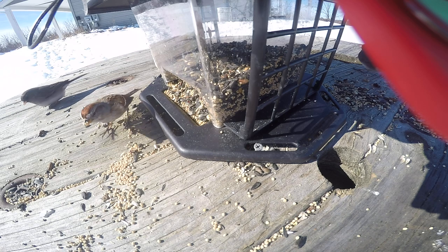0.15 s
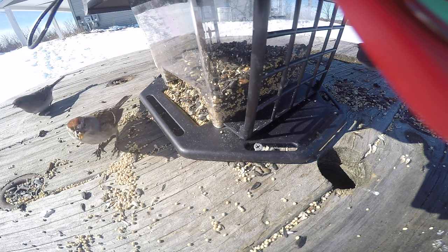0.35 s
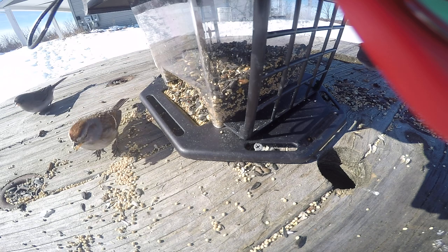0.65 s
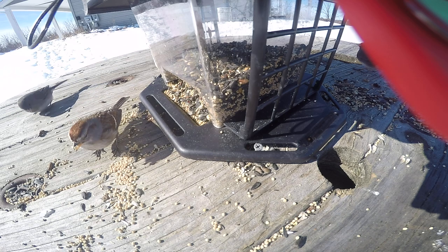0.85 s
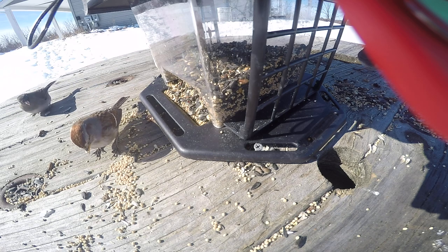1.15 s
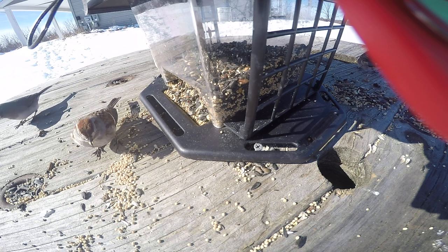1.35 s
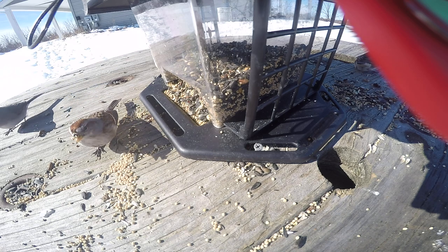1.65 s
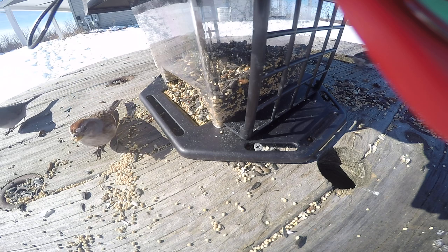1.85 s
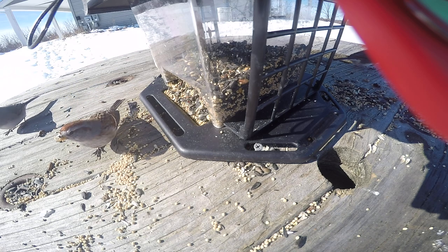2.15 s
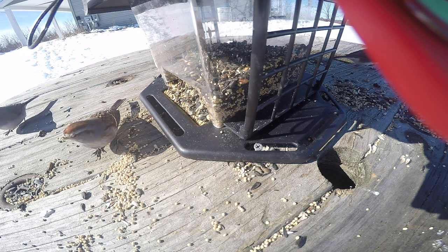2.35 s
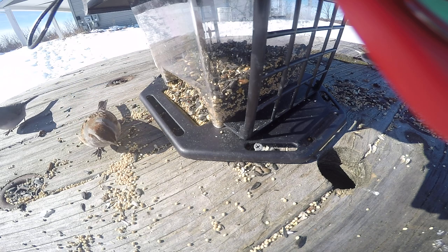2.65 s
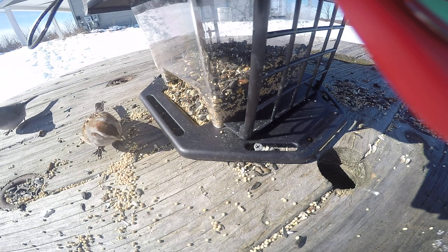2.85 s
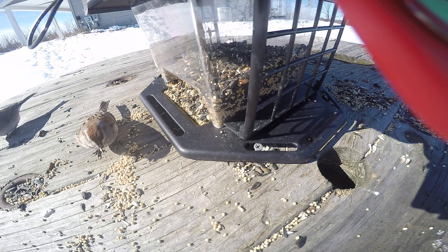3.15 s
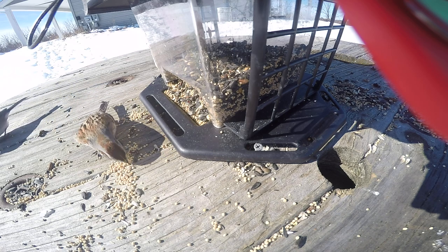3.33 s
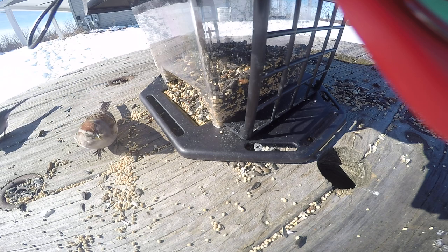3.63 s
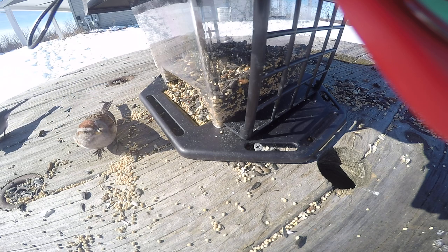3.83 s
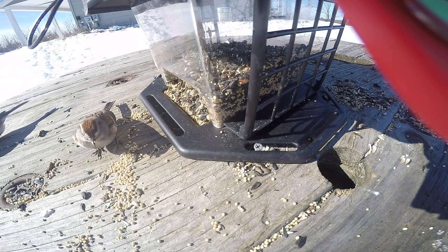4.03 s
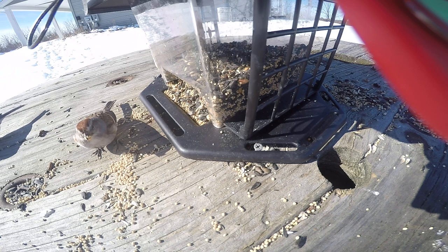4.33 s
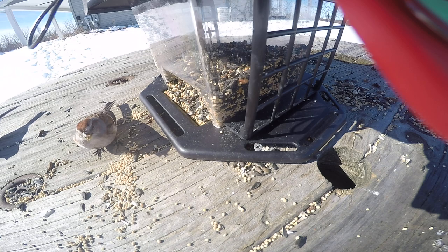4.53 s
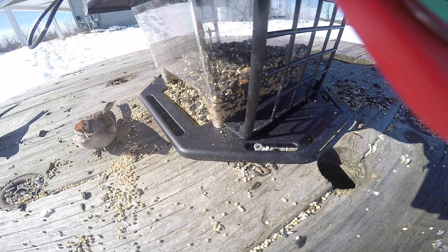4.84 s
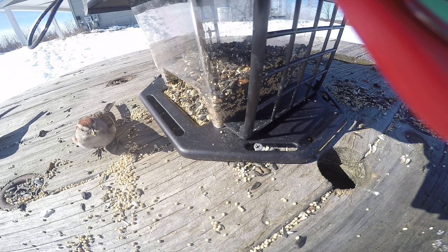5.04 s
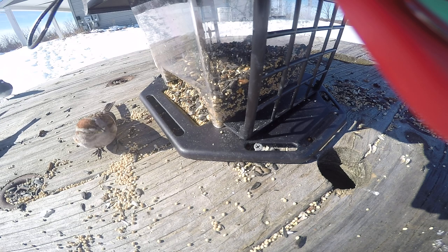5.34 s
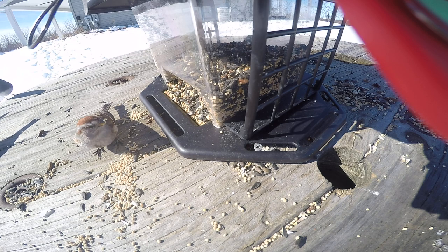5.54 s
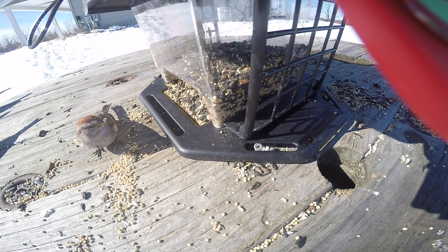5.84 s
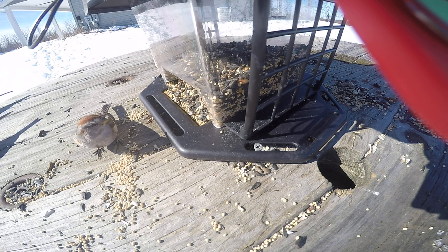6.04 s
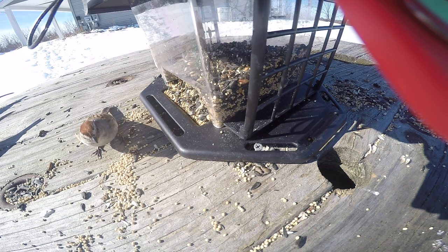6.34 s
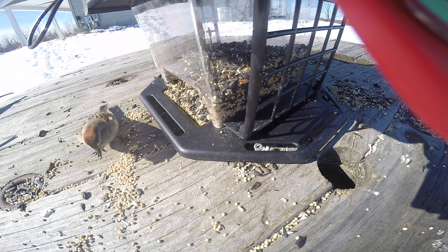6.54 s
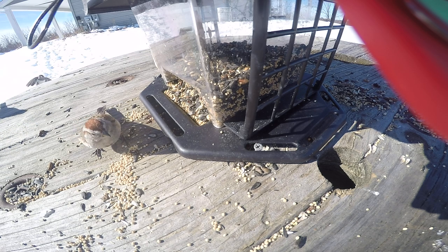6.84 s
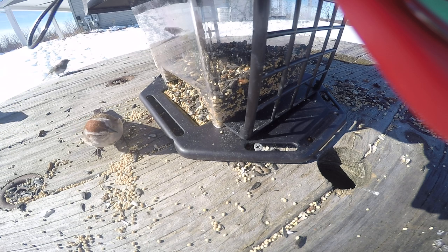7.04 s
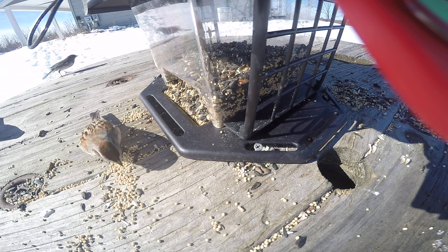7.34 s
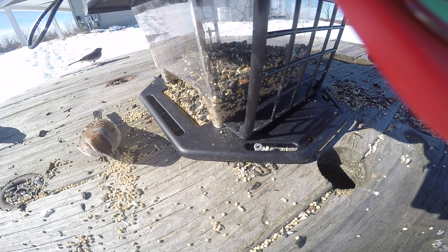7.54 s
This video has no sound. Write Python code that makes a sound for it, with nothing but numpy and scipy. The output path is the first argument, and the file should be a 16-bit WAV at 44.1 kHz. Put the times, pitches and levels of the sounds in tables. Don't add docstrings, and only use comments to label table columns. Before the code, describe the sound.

Over soft hiss and wind rumble, beaks tick on seed, a bird gives a quick run of descending chips, and little feet knock on board.

```python
import sys
import numpy as np
from scipy import signal
from scipy.fft import rfft, irfft
from scipy.io import wavfile
from scipy.ndimage import uniform_filter1d

SR = 44100
rng = np.random.default_rng(int(sys.argv[2]) if len(sys.argv) > 2 else 0)


def rack_gain(trim_db):
    fader = np.asarray(trim_db, float)
    return 10 ** (fader / 20)


def int16_out(signal):
    q = np.round(np.clip(np.atleast_2d(signal).T, -1, 1) * 32767)
    wavfile.write(sys.argv[1], SR, q.astype(np.int16))


N = 338688

# start in seconds, peak level in dB, level of the bright part in dB,
# ring time in seconds, level of the claw tick on the tray in dB.
LANDINGS = [(4.263, -46.5, -49.5, 0.11, -41), (4.286, -39, -52, 0.11, -46), (4.391, -44, -50.5, 0.13, -54),
            (4.476, -38.5, -47.5, 0.08, -49), (4.598, -41, -52, 0.056, -52), (4.626, -45, -51, 0.14, -62),
            (4.724, -49.5, -57, 0.084, -52.5), (4.805, -55, -63, 0.1, -53.5),
            (4.866, -33.5, -39.5, 0.12, -34.5), (4.89, -47.5, -71, 0.16, -68), (5.65, -52, -56, 0.071, -48),
            (5.926, -52.5, -72, 0.062, -52), (6.039, -46, -50, 0.11, -62), (6.254, -51, -58, 0.08, -66),
            (6.413, -45, -51.5, 0.13, -62), (6.608, -69, -65, 0.094, -68), (6.738, -39, -50.5, 0.12, -60),
            (6.776, -52, -58, 0.054, -54), (1.815, -55, -52, 0.07, -70)]


def level(x, db):
    return x * rack_gain(db) / np.sqrt(np.mean(x ** 2))


def band(x, lo_hz, hi_hz, order=2):
    edges_hz = [lo_hz, min(hi_hz, 0.45 * SR)]
    return signal.sosfilt(signal.butter(order, edges_hz, "band", fs=SR, output="sos"), x)


def add(out, s, x):
    i = int(s * SR)
    out[i:i + len(x)] += x[:len(out) - i]


def ring(hz, t60, t):
    return np.sin(2 * np.pi * hz * t) * np.exp(-np.log(1000) * t / t60)


def camera():
    # frequency in Hz, density in dB per Hz.
    hiss_colour = [(60, -34), (110, -3.5), (400, -11.5), (1200, -15.5), (1500, -16.5), (2000, -15.5),
                   (3300, -16.5), (7000, -22.5), (13900, -28), (15300, -33)]
    # centre in Hz, width in Hz, level in dB.
    whine_bands = [(1969, 83, -76), (1163, 105, -78), (9540, 110, -84), (14250, 300, -86)]
    hz = np.arange(N // 2 + 1) * SR / N + 1
    corner_hz, corner_db = np.transpose(hiss_colour)
    colour = rack_gain(np.interp(np.log(hz), np.log(corner_hz), corner_db))
    hiss = level(irfft(rfft(rng.standard_normal(N)) * colour, N), -65)
    for centre_hz, width_hz, db in whine_bands:
        lo_hz, hi_hz = centre_hz - width_hz / 2, centre_hz + width_hz / 2
        hiss = hiss + level(band(rng.standard_normal(N), lo_hz, hi_hz, order=1), db)
    whine = np.sin(2 * np.pi * 1948.5 * np.arange(N) / SR)
    return hiss + level(whine, -72.5)


def wind():
    # time in seconds, strength in dB.
    gusts = [(0.0, -62.5), (0.51, -54), (0.62, -59.5), (1.6, -56), (1.67, -73), (1.71, -54), (1.9, -50.5),
             (1.94, -62.5), (4.28, -63.5), (4.3, -55.5), (5.6, -66), (5.67, -53), (5.73, -63),
             (6.72, -62.5), (6.8, -39.5), (6.87, -43), (6.99, -61.5), (7.68, -64)]
    # time in seconds, rise in seconds, fall in seconds, level in dB.
    wing_puffs = [
        (1.8, .05, .06, -62),
        (6.81, .035, 0.052, -40),
    ]
    rumble_db, buffet_db, buffet_follows = -1, -66.5, 0.76
    s, gust_db = np.transpose(gusts)
    t = np.arange(N) / SR
    gust_db = np.interp(t, s, gust_db)
    puffs = np.zeros(N)
    for at, rise, fall, db in wing_puffs:
        puffs += rack_gain(db) * np.exp(-np.abs(t - at) / np.where(t < at, rise, fall))
    rumble = level(band(rng.standard_normal(N), 17.5, 48), 0) * rack_gain(gust_db + rumble_db)
    buffet = level(band(rng.standard_normal(N), 49.4, 82), 0)
    buffet = buffet * rack_gain(buffet_db + buffet_follows * (gust_db + 62.5))
    flapping = puffs * level(band(rng.standard_normal(N), 72, 111), 0)
    return rumble + buffet + flapping


def ticks():
    # start in seconds, peak in dB, centre in Hz, crack against the tone in dB.
    seed_ticks = [(0.2782, -54, 3130, 4.5), (1.498, -56, 3630, 1), (1.5204, -51.5, 3030, 4),
                  (1.8175, -45, 3100, -2), (1.828, -50.5, 3470, 3), (2.092, -52, 2490, 6),
                  (2.176, -56, 3510, -5), (2.231, -43.5, 2850, -13), (3.5036, -41, 4600, -1.5),
                  (3.5813, -53.5, 10060, -5), (3.8448, -62, 3050, -5), (4.2283, -44.5, 2710, -14.5),
                  (4.5723, -51, 2900, 4), (4.6967, -49, 2520, -5), (5.1203, -58, 2050, 7),
                  (5.3945, -60, 3550, 9), (5.4869, -57.5, 5170, 4), (5.6644, -53, 2370, -3),
                  (5.8044, -48.5, 3060, 3.5), (5.896, -53, 2870, 6), (5.9508, -55, 4030, -5),
                  (5.9644, -57, 2670, -5), (5.9903, -54, 3160, 3), (6.3957, -58, 2190, 4),
                  (6.6325, -53.5, 3080, -5), (6.7062, -54, 2560, -5), (6.995, -57.5, 2130, 11),
                  (7.3053, -48, 5300, -5), (7.423, -55, 11500, -20), (4.4752, -46, 3400, -4)]
    # start in seconds, peak in dB, centre in Hz, crack against the tone in dB.
    dull_pecks = [
        (1.7866, -46, 1860, -1),
        (1.8165, -38, 1760, -13),
        (6.0456, -50, 1690, -9),
    ]
    # start in seconds, peak in dB.
    husk_snaps = [(1.7868, -58), (3.5036, -62), (5.8044, -61), (5.9903, -62)]
    claw_lead_s, tray_hz, claw_crack_db = 0.001515, 2520, -4
    husk_hz, husk_crack_db = 8800, 7
    tick_ring_s, peck_ring_s = 0.024, 0.017
    claws = [(s - claw_lead_s, db, tray_hz, claw_crack_db) for s, *_, db in LANDINGS]
    husks = [(s, db, husk_hz, husk_crack_db) for s, db in husk_snaps]
    rows = [(*row, tick_ring_s) for row in [*seed_ticks, *claws, *husks]]
    rows += [(*row, peck_ring_s) for row in dull_pecks]

    out, t = np.zeros(N), np.arange(int(0.033 * SR)) / SR
    chance = rng.standard_normal((len(rows), 2, len(t)))
    for (s, db, hz, crack_db, t60), (push, snap) in zip(rows, chance):
        tone = band(push * np.exp(-np.log(1000) * t / max(t60, 0.003)), hz * 0.9, hz * 1.1)
        crack = band(snap * np.exp(-t / 0.002), hz * 0.45, hz * 1.9)
        tone = tone / np.abs(tone).max()
        crack = rack_gain(crack_db) * crack / np.abs(crack).max()
        add(out, s, rack_gain(db - 1.0) * (tone + crack))
    return out


def scrapes():
    # start in seconds, length in seconds, level in dB, centre in Hz, upper hiss in dB.
    drags = [(4.413, .034, -56, 2520, -6), (4.634, 0.037, -47.5, 2530, -13),
             (4.638, 0.038, -53.5, 3370, -7), (5.86, 0.085, -69, 3200, 3), (6.7, 0.055, -66, 1900, 7.5),
             (4.48, .05, -66, 1400, 4), (4.6, .09, -66, 1500, 7), (4.265, .045, -67, 1200, 4),
             (1.49, .05, -70, 2600, 4), (4.9, 0.057, -72.5, 2400, 1), (5.948, .02, -72, 4200, 11.5),
             (6.035, 0.029, -66, 1670, -6), (6.395, 0.021, -70, 1400, 0), (6.252, 0.024, -71.5, 1170, 7.5)]
    out = np.zeros(N)
    for s, length, db, hz, upper_db in drags:
        count = int(length * SR)
        slips = rng.standard_normal(count) * rack_gain(2.2 * rng.exponential(size=count))
        slips = slips * (rng.random(count) < 0.05)
        hollow = level(band(slips, hz * 0.92, hz * 1.08), 0)
        upper = level(band(slips, hz * 0.45, hz * 1.9), upper_db)
        add(out, s, rack_gain(db) * (hollow + upper) * np.hanning(count) ** 0.39)
    return out


def unroll(rows):
    s, *columns = np.transpose(rows)
    t = np.arange(s[0], s[-1], 1 / SR)
    ends = np.clip(np.minimum(t - s[0], s[-1] - t) / 0.0015, 0, 1)
    return ends, [uniform_filter1d(np.interp(t, s, c), size=40) for c in columns]


def squeaks():
    # time in seconds, pitch in Hz, level in dB.
    calls = [
        [(1.595, 2900, -54), (1.599, 3300, -44), (1.603, 3830, -40.5), (1.609, 4270, -44), (1.615, 5220, -34),
         (1.618, 5600, -48)],
        [(1.607, 2500, -46), (1.612, 3430, -35), (1.618, 6650, -23.5), (1.6215, 7200, -32),
         (1.624, 7580, -24.5), (1.630, 7740, -22.5), (1.634, 4930, -37.5), (1.638, 3260, -31),
         (1.648, 2330, -58)],
        [(1.681, 3400, -55), (1.686, 3530, -33), (1.690, 4380, -39), (1.695, 5040, -31), (1.7, 5060, -32),
         (1.712, 5250, -42), (1.7185, 6150, -38), (1.726, 6300, -42), (1.730, 5600, -56)],
        [(1.690, 2495, -44), (1.696, 2790, -43.5), (1.710, 3075, -38.5), (1.716, 3440, -44), (1.720, 5380, -32),
         (1.725, 3220, -53), (1.732, 2700, -51)],
    ]
    buzz_hz, rasp_db, beak_top_hz = 584, -10, 8000
    clear_db, buzz_per_db, buzz_most = -25.5, 0.045, 0.8
    octave_start_db, octave_until_hz, octave_db_per_khz = -8.5, 4200, -14
    out = np.zeros(N)
    for rows in calls:
        ends, (hz, db) = unroll(rows)
        buzz = np.clip(buzz_per_db * (clear_db - db), 0, buzz_most)
        octave_db = octave_start_db + octave_db_per_khz * np.clip(hz - octave_until_hz, 0, None) / 1000
        wobble = uniform_filter1d(rng.standard_normal(len(hz)), size=80)
        flutter = np.sin(2 * np.pi * np.cumsum(buzz_hz * (1 + 0.82 * wobble)) / SR)
        phase = 2 * np.pi * np.cumsum(hz * (1 + 0.27 * buzz * wobble)) / SR + 0.86 * buzz * flutter
        breath = level(band(rng.standard_normal(len(hz)), 3000, beak_top_hz), 0)
        voice = np.sin(phase) + rack_gain(octave_db) * np.sin(2 * phase) + rack_gain(rasp_db) * buzz * breath
        loudness = rack_gain(db + 18 * buzz * wobble[::-1]) * (1 + buzz * flutter) ** 1.2
        add(out, rows[0][0], ends * loudness * voice)
    beak = signal.ellip(6, 0.5, 50, beak_top_hz, fs=SR, output="sos")
    clear = signal.sosfilt(beak, band(out, 2200, 19000, order=3))
    strain = band(out * np.abs(out), 8700, 13200, order=4)
    return clear + level(strain, -75.5)


def knocks():
    # frequency in Hz, level in dB, share of the ring time.
    board_modes = [(149.3, -9, 1.9), (182.7, -4, 1.5), (230.5, 5.5, 1.13), (317, -17.5, 0.89),
                   (430, -18, 0.35)]
    # frequency in Hz, level in dB, ring time in seconds.
    slat_modes = [(550, -13, 0.066), (838, 7, 0.034), (1184, -24, .03), (1366, 1, 0.034), (1704, 9, 0.032),
                  (2160, -13, 0.064), (2580, 6, 0.01), (3130, 2, 0.026), (4300, -14, 0.02)]
    out, t = np.zeros(N), np.arange(int(0.2 * SR)) / SR
    chance = rng.standard_normal((len(LANDINGS), 2, len(board_modes) + len(slat_modes)))
    grit = rng.standard_normal((len(LANDINGS), len(t)))
    for (s, db, bright_db, t60, _), (tune, size), noise in zip(LANDINGS, chance, grit):
        low, high = np.zeros(len(t)), np.zeros(len(t))
        for k, (hz, mode_db, share) in enumerate(board_modes):
            mode = ring(hz * (1 + 0.027 * tune[k]), max(t60, 0.02) * share, t)
            low += rack_gain(mode_db + 3.1 * size[k]) * mode
        for k, (hz, mode_db, ring_s) in enumerate(slat_modes):
            mode = ring(hz * (1 + 0.015 * tune[-k - 1]), ring_s, t)
            high += rack_gain(mode_db + 2.5 * size[-k - 1]) * mode
        high = signal.fftconvolve(high, noise[:int(0.005 * SR)])[:len(t)]
        low = low * (1 - np.exp(-t / 0.0012))
        tail = level(band(noise, 350, 1800, order=1), bright_db - 13) * np.exp(-t / 0.018)
        thud = level(band(noise[::-1], 120, 347), db - 14.0)
        thud = thud * (1 - np.exp(-t / 0.0055)) * np.exp(-t / 0.026)
        low = rack_gain(db) * low / np.abs(low).max()
        high = rack_gain(bright_db + 1.0) * high / np.abs(high).max()
        add(out, s, low + high + tail + thud)
    return out


def near_echoes(x):
    echo_ms, echo_db = 4.2, -3.5
    t = np.arange(int(0.02 * SR)) / SR
    response = rng.standard_normal(len(t)) * (rng.random(len(t)) < 0.07)
    response = response * (t > 0.0003) * np.exp(-t * 1000 / echo_ms)
    response = rack_gain(echo_db) * response / np.sqrt(np.sum(response ** 2))
    return x + signal.fftconvolve(x, response)[:len(x)]


def chips():
    # start in seconds, start pitch in Hz, level early in the fall in dB, midway in dB,
    # near 3 kHz in dB.
    falls = [(2.2198, 9570, -44, -50, -42), (2.2906, 6870, -38, -39, -38), (2.3870, 7350, -43, -47.5, -38),
             (2.5089, 7570, -40, -51, -36), (2.627, 7750, -39, -46, -34.5),
             (2.664, 10360, -35.5, -38, -45.5), (2.7258, 10300, -34, -37, -43),
             (2.7952, 8860, -35, -50, -38), (2.8713, 7450, -34, -50, -36), (3.024, 7640, -29, -65, -39),
             (6.0284, 11370, -35.5, -63, -49), (6.6702, 10150, -33, -60, -43.5),
             (6.7394, 10060, -34.5, -58, -42), (6.8128, 6740, -59, -41.5, -42.5),
             (7.0764, 9450, -41.5, -52, -42.5), (7.1443, 10030, -44.5, -51, -41),
             (7.221, 6680, -54, -42, -40), (7.5742, 9150, -38.5, -52, -42)]
    end_hz, fall_ms, fade_ms = 1946, 3.2, 1.3
    octave_db = -8
    out, t = np.zeros(N), np.arange(int(0.04 * SR)) / SR
    for s, hz, high_db, mid_db, low_db in falls:
        pitch = end_hz + (hz - end_hz) * np.exp(-(t * 1000 / fall_ms) ** 1.427)
        phase = 2 * np.pi * np.cumsum(pitch) / SR
        throat_hz = [2200, 3300, hz * 0.58, hz * 0.76, hz * 0.88, hz]
        throat_db = [low_db - 10.5, low_db, mid_db, high_db - 2, high_db, high_db - 4]
        db = np.interp(np.log(pitch), np.log(throat_hz), throat_db)
        fade = np.exp(-np.clip(t * 1000 - 2.4 * fall_ms, 0, None) / fade_ms)
        shape = np.clip(t / 0.002, 0, 1) * fade
        octave = rack_gain(low_db + octave_db) * np.exp(-t / 0.009)
        octave = octave * np.clip((12500 - 2 * pitch) / 2500, 0.1, 1) * (2 * pitch < 16000)
        voice = rack_gain(db) * np.sin(phase) + octave * np.sin(2 * phase)
        add(out, s, near_echoes(shape * voice))
    return out


def held_notes():
    # start in seconds, length in seconds, pitch in Hz, level in dB,
    # second harmonic against the first in dB.
    nasal_notes = [(2.297, .042, 1783, -54, 4.5), (2.394, 0.052, 1880, -53, -11),
                   (2.516, 0.058, 1950, -52.5, -10), (2.634, .071, 1834, -51, -7),
                   (2.732, .014, 1900, -55, -9), (2.801, .023, 1646, -52, -7),
                   (2.878, .046, 1733, -49, -8.5), (3.03, .068, 1560, -55, -0.8),
                   (6.823, 0.069, 1930, -65.5, -3.5), (7.229, .062, 1887, -62, -7.5)]
    settle_share, settle_ms = 0.121, 4.03
    sag_hz_per_s, sag_from_hz = 16, 1639
    droop_share, droop_ms, fade_db, nasal_end_db = 0.16, 16, -21.5, 11.5
    fourth_db, fifth_db, nasal_dulls = -75, -74, 1.1
    upper_follows, bright_start_db, bright_ms = 0.4, 11, 18
    out = np.zeros(N)
    for s, length, start_hz, db, nasal_db in nasal_notes:
        t = np.arange(int(length * SR)) / SR
        ends = np.clip(np.minimum(t, length - t) / 0.0012, 0, 1)
        settle = np.exp(-t * 1000 / settle_ms)
        spent = np.clip(1 - (length - t) / min(droop_ms / 1000, length / 2), 0, 1)
        plain = np.clip(-nasal_db / 10, 0, 1)

        sag = sag_hz_per_s * (start_hz - sag_from_hz) * np.clip(1 - nasal_db / 5, 0, 1) ** 0.3
        landing = settle_share * settle * np.clip(1 - nasal_db / 6, 0, 1)
        droop = droop_share * min(length / 0.042, 1) * spent ** 1.26
        hz = (start_hz - sag * t) * (1 + landing - droop)

        first = db + fade_db * spent ** 1.54
        linger = nasal_end_db * (0.33 + plain) * np.sin(np.pi * spent ** 1.4)
        second = first + nasal_db - 6 * settle + linger
        dull = nasal_dulls * max(nasal_db + 2.5, 0)
        upper = upper_follows * (db + 55) - dull
        upper = upper + bright_start_db * np.exp(-t * 1000 / bright_ms) + 0.73 * fade_db * spent ** 2
        fourth, fifth = fourth_db + upper, fifth_db + upper
        stack = [first, second, (second + fourth) / 2 - 8, fourth, fifth - dull, fifth - 11]

        waver = uniform_filter1d(rng.standard_normal((7, len(hz))), size=150)
        waver = uniform_filter1d(waver, size=150) * np.sqrt(150)
        phase = 2 * np.pi * np.cumsum(hz * (1 + 0.008 * waver[-1])) / SR
        patchy_db = waver * (1.7 + 1.37 * np.arange(7))[:, None]
        voice = np.zeros(len(t))
        for k, harmonic_db in enumerate(stack):
            voice += rack_gain(harmonic_db + patchy_db[k]) * np.sin((k + 1) * phase)
        add(out, s, ends * np.sqrt(2) * voice)
    return out


def sway():
    # start in seconds, length in seconds, level in dB.
    rockings = [
        (4.27, .48, -45),
        (5.6, 0.77, -54.5),
        (6.739, .28, -42),
    ]
    sway_hz = 14.5
    out = np.zeros(N)
    for s, length, db in rockings:
        t = np.arange(int(length * SR)) / SR
        swell = np.hanning(len(t)) ** 0.39
        add(out, s, np.sqrt(2) * rack_gain(db) * swell * np.sin(2 * np.pi * sway_hz * t))
    return out


def scene():
    background = camera() + wind() + sway()
    table = ticks() + scrapes() + knocks()
    birds = squeaks() + chips() + held_notes()
    return (background + table + birds)[None, :]


def top_cut(x):
    return signal.sosfilt(signal.butter(12, 15700, fs=SR, output="sos"), x)


def record(dry):
    top = signal.ellip(8, 0.3, 60, 15350, fs=SR, output="sos")
    mix = signal.sosfilt(top, dry)
    return top_cut(mix)


dry = scene()
out = record(dry)
int16_out(out)
```